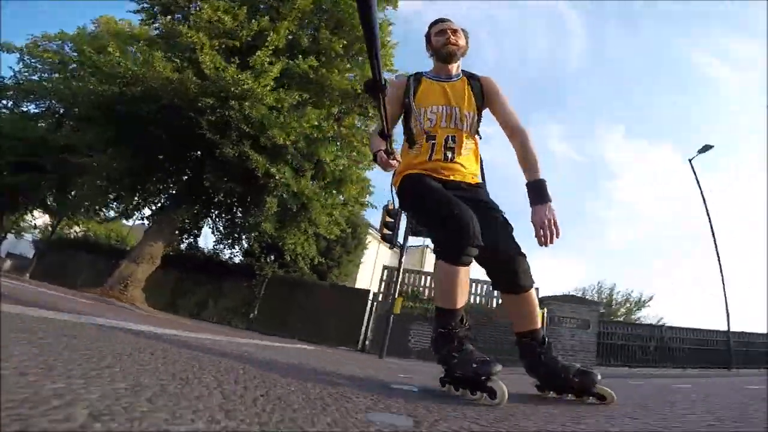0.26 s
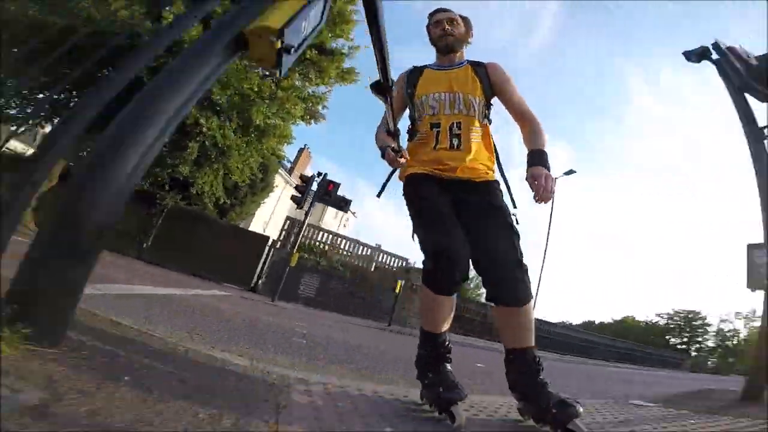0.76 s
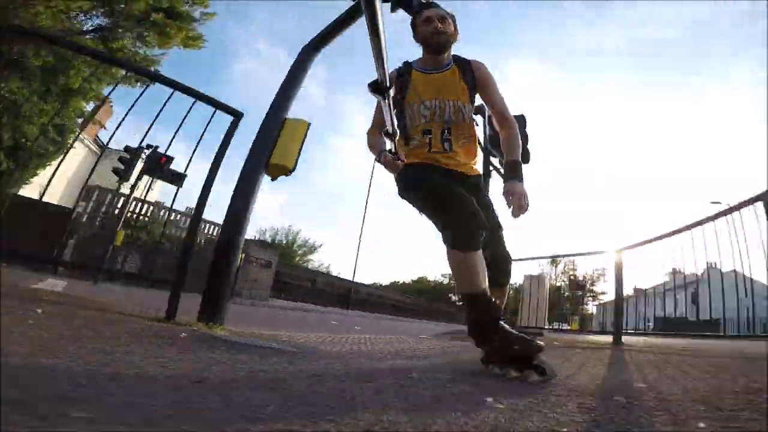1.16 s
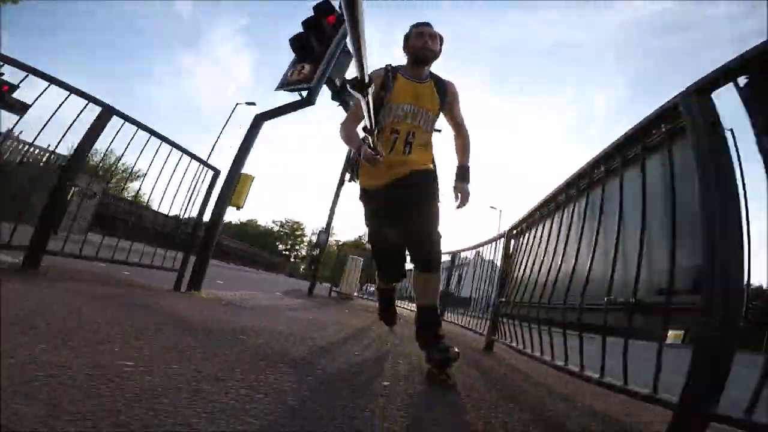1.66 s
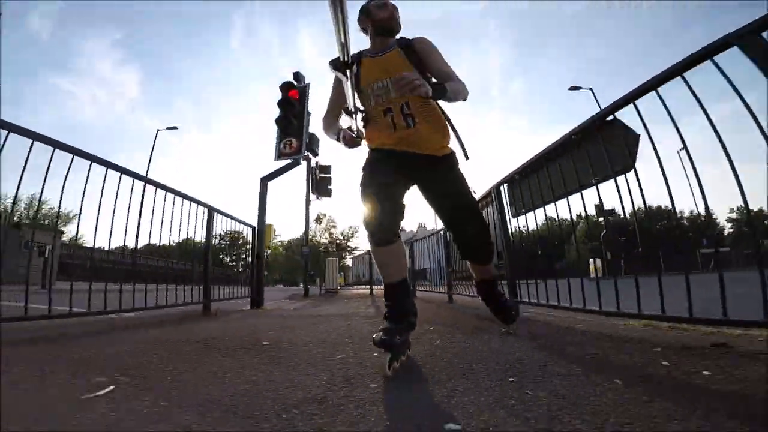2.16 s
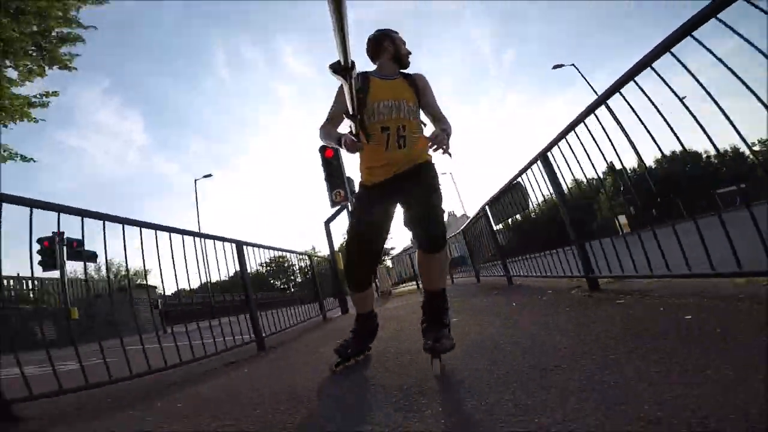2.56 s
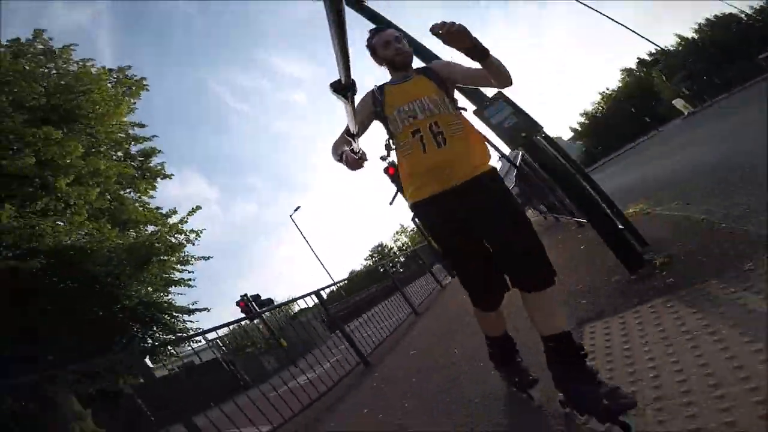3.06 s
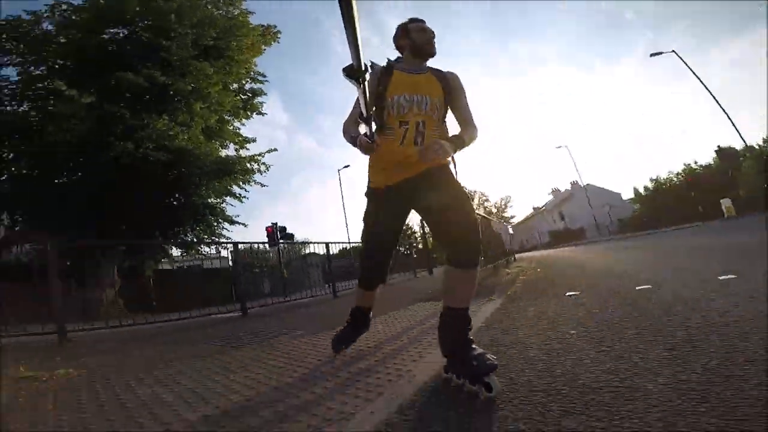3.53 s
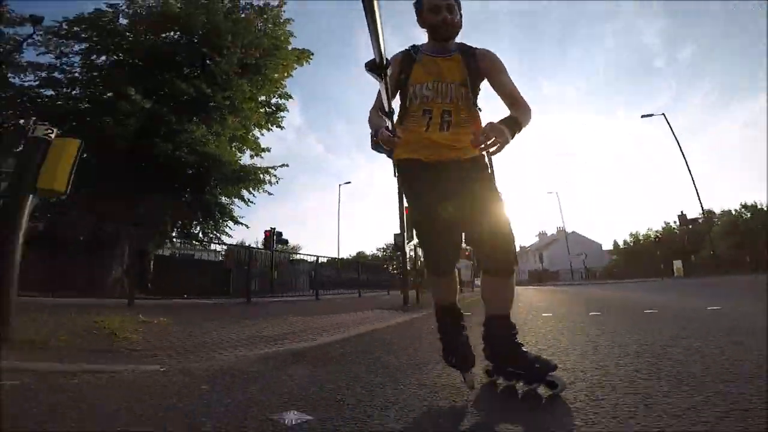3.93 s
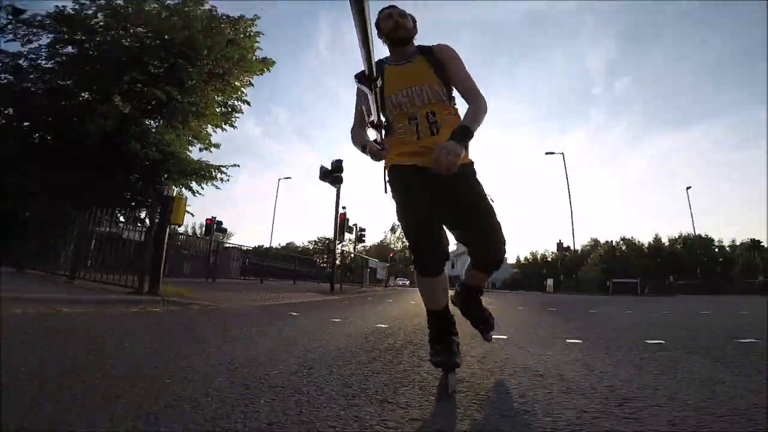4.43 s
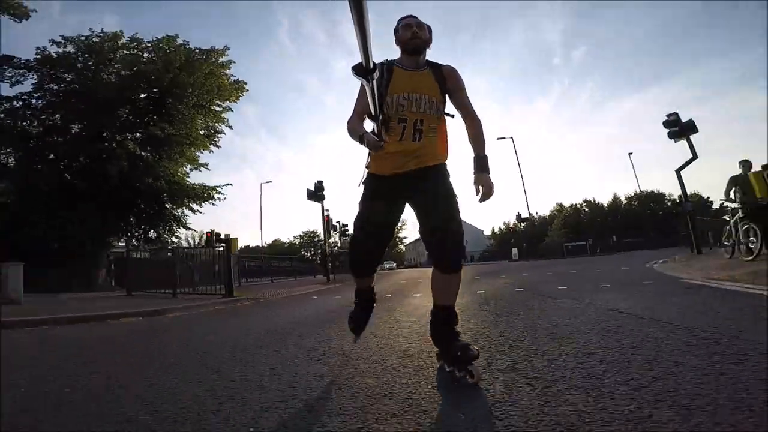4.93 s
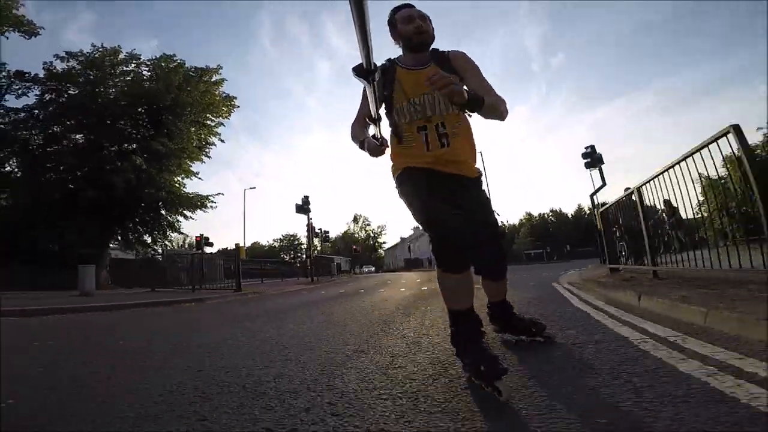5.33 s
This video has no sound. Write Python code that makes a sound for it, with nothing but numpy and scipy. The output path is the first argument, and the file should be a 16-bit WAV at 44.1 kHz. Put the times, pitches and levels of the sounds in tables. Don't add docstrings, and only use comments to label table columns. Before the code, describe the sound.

Close, dry, mono outdoor sound from a microphone held low on a pole near inline skates. Deep, uneven wind rumble runs throughout and is much louder than the thin, gritty wheel noise. From 0 to 1.4 s hard wheels roll on rough ground, with clusters of sharp ticks and rattles at joints, faint bearing singing and a low boot thud near 0.95 s. Wind swells and flaps from about 1.2 s. A hard landing snaps and thuds at 1.6 s; rolling is quieter afterwards, with a short rattling scrape and thud around 2.0-2.1 s and a strong gust. Sparse stone ticks follow at 2.7-3.0 s. Studded paving clatters at 3.15-3.5 s, with several soft thuds and a tiny high squeak at 3.55 s. Then smoother rolling swells and fades, with short mid-pitched jolts at 4.2-4.8 s, a loud hollow mount knock at 4.84 s and wind buffets to 5.6 s.

```python
import sys
import numpy as np
from scipy import signal
from scipy.fft import rfft, irfft, next_fast_len
from scipy.io import wavfile
from scipy.ndimage import uniform_filter1d, minimum_filter1d

SR = 44100
rng = np.random.default_rng(int(sys.argv[2]) if len(sys.argv) > 2 else 0)


def output_pcm(signal):
    pcm = np.clip(np.atleast_2d(signal).T, -1, 1) * 32767
    wavfile.write(sys.argv[1], SR, np.round(pcm).astype(np.int16))


def field_ratio(decibels):
    return 10 ** (np.asarray(decibels, dtype=float) / 20)


N = 246519


def evened(x):
    return x / np.sqrt(np.mean(x ** 2) + 1e-20)


def columns(rows, t):
    s, *values = np.transpose(rows)
    return np.array([np.interp(t, s, v) for v in values])


def add(mix, s, sound):
    part = mix[max(round(s * SR), 0):][:len(sound)]
    part += sound[:len(part)]


def ring(x, modes):
    hz = abs(np.fft.fftfreq(next_fast_len(len(x)), 1 / SR))
    power = sum(field_ratio(2 * db) / (1 + (1.19 * (hz - f) / w) ** 2) ** 2 for f, w, db in modes)
    log_gain = 0.5 * np.log(power / np.mean(power))
    body = np.exp(np.conj(signal.hilbert(log_gain)))[:len(hz) // 2 + 1]
    return irfft(rfft(x, len(hz)) * body, len(hz))[:len(x)]


def lumps(seconds):
    size = max(int(seconds * SR), 2)
    smooth = uniform_filter1d(rng.standard_normal(N), size)
    return evened(uniform_filter1d(smooth, size))


def patchy(x, patchy_db):
    z = signal.stft(x, nperseg=256)[2]
    patches = uniform_filter1d(rng.standard_normal(z.shape), 4, 0)
    patches = evened(uniform_filter1d(patches, 7, 1))
    gain = field_ratio(patchy_db * patches - patchy_db ** 2 / 8.4)
    return signal.istft(z * gain, nperseg=256)[1][:N]


def asphalt(per_s, spread_db, lumpy_db):
    size_db = spread_db * np.minimum(rng.exponential(1, N), 4)
    grains = rng.standard_normal(N) * (rng.random(N) < per_s / SR) * field_ratio(size_db)
    force = evened(grains) + 1.97 * rng.standard_normal(N)
    return evened(force * field_ratio(lumpy_db * lumps(0.026)))


# start_s, roughness_db, heel_load_db
ROAD = [(0.0, -61, -4.5), (0.42, -62.5, -7), (0.92, -65.5, -2.5), (1.1, -66.5, -4.5), (1.38, -72, -0.5),
        (2.12, -70.5, 2), (2.46, -72, 4), (2.69, -68, 2.5), (2.86, -70.5, -0.5), (3.11, -65.5, -4),
        (3.38, -63.5, -4), (3.63, -71.5, -2.5), (4.12, -68.5, -2.5), (4.3, -64.5, -3.5), (4.69, -66.5, 1),
        (5.12, -70.5, -1), (5.36, -67, 1), (5.59, -62.5, 7)]
# hz, width_hz, level_db
BOOT_MODES = [(926, 230, -4), (1060, 28, -2)]
# hz, width_hz, level_db
FRAME_MODES = [(1417, 100, 4.5), (1653, 110, 2), (1863, 130, 3), (2030, 134, -1.5), (2274, 490, -4.5),
               (2578, 154, -1.5), (2790, 68, -5)]
# hz, width_hz, level_db
TREAD_MODES = [(3650, 710, 1), (3970, 170, -1), (4530, 470, 2), (5210, 480, -2), (6530, 2000, -3),
               (7350, 240, -0.5), (8710, 1340, 1), (9740, 1000, -1.5), (10250, 810, -6)]
# hz, width_hz, level_db
GRIT_BANDS = [(11400, 900, 0), (12400, 1000, 0), (13400, 1000, -2), (14400, 1000, -4)]


def rolling():
    rough_db, heel_db = columns(ROAD, np.arange(N) / SR)
    over_db = rough_db + 66
    road = asphalt(per_s=900, spread_db=2.0, lumpy_db=0.78)
    frame = road * field_ratio(rough_db)
    tread = road * field_ratio(-73 + 0.31 * over_db)
    grit = road * field_ratio(-82.5 + 0.083 * over_db)
    boot = ring(road * field_ratio(rough_db + heel_db), BOOT_MODES)
    pebbles_per_s, pebble_db, spread_db = 41, -89, 3.5
    pebble_db = pebble_db + over_db + spread_db * np.minimum(rng.exponential(1, N), 3)
    flicks = (rng.random(N) < pebbles_per_s / SR) * field_ratio(pebble_db)
    grit = grit + signal.oaconvolve(flicks, np.hanning(220), "same") * rng.standard_normal(N)
    low = boot + patchy(ring(frame, FRAME_MODES), patchy_db=1.5)
    return low, ring(tread, TREAD_MODES) + ring(grit, GRIT_BANDS)


# start_s, length_s, lift_db
GLIDE_LOADS = [
    (-.2, 0.73, 8.5),
    (0.599, .42, 9),
    (3.116, 0.54, 8),
    (3.84, .1, 7),
    (4.097, .56, 8.5),
    (5.197, .6, 5),
]
# hz, width_hz, level_db
AXLE_MODES = [(6050, 340, 16), (6630, 240, 17)]


def axles():
    t = np.arange(N) / SR
    level_db, ease_s = -86, 0.14
    for s, length, lift_db in GLIDE_LOADS:
        inside_s = np.minimum(t - s, s + length - t)
        level_db = level_db + lift_db * np.clip(inside_s / ease_s + 0.5, 0, 1)
    return ring(asphalt(per_s=1100, spread_db=2, lumpy_db=2.5) * field_ratio(level_db), AXLE_MODES)


def strike(length_s, chance):
    t = np.arange(chance.shape[1]) / SR
    swell = 1 - np.exp(-(t / (0.5 * length_s)) ** 2)
    fade = np.exp(-t / (0.22 * length_s)) + 0.33 * np.exp(-t / (1.62 * length_s))
    tick = 0.3 * np.exp(-((t - 0.4 * length_s - 0.001) / 0.0016) ** 2)
    bumps = evened(uniform_filter1d(chance[0], 60))
    rattle = field_ratio(2.9 * np.clip(bumps, -2, 1.5))
    return (swell * fade * rattle + tick) * evened(0.15 * chance[1] + chance[2:])


# start_s, level_db, dullness_db, length_ms
SLAB_HITS = [(.0124, -44.5, -6, 7), (.0425, -50, 1, 11), (.066, -53, -8, 7), (.086, -47.5, -5, 6),
             (.121, -53, -3, 8), (.25, -54, -12, 10), (.293, -51, -2, 8), (.311, -51.5, 2, 25),
             (.451, -60, 5, 8), (.54, -53, -10, 10), (.587, -50, -3, 9), (.6065, -47, -10, 21),
             (.632, -44, -10, 10), (.658, -47, -6, 14), (.7057, -42, -11, 13), (.716, -42.5, -21, 7),
             (.826, -55, -2, 8), (.866, -46, -5, 8), (.884, -47, -8, 9), (.894, -44, -3, 17),
             (.9476, -44.5, -12, 8), (.951, -56.5, 13, 9), (1.002, -47, -9, 8), (1.0157, -46, -5, 10),
             (1.025, -48, 0, 7), (1.0715, -45.5, -44, 5), (1.172, -56, -1, 10), (1.2175, -51.5, -22, 10),
             (1.2655, -57.5, 2, 13), (1.344, -56.5, 2, 12)]
# start_s, level_db, dullness_db, length_ms, upper_frame_lean_db
STUD_HITS = [(1.5943, -48, -1, 7, 2), (1.6, -37, -20, 7, 1), (1.958, -72, 12, 9.2, -3),
             (1.9906, -54, 1, 6, -1), (2.016, -52, 3, 19, 0), (2.028, -53, -4, 7.7, 3),
             (2.05, -45, -3, 10, 3), (2.0704, -49, -10, 17, 7), (2.079, -46, -3, 9.2, 2),
             (2.117, -48, -14, 12.5, -8), (3.152, -36.5, -13.5, 15, -4), (3.161, -48, -24, 7, 0),
             (3.1737, -52, -3, 9.2, -1), (3.182, -44, -15, 9, 3), (3.19, -56, -1, 9.2, 2),
             (3.215, -43, -18, 4.6, 5), (3.218, -37, -14.5, 11, -6.5), (3.2524, -45.5, -9, 22, -1),
             (3.266, -54, -11, 8, -7), (3.363, -48.5, -6, 7, 0), (3.417, -52, -1, 13, -6.5),
             (3.434, -52, -7, 8, 0), (3.503, -48.5, -1.5, 8, 1), (3.508, -45, -11, 6.3, 9)]
# start_s, level_db, dullness_db, length_ms
STONE_HITS = [(2.7, -49, -9, 13.6), (2.749, -54, -2.5, 8), (2.903, -51.5, -9, 17), (2.9133, -53.5, -7, 7.5),
              (2.985, -53, -8, 8.2), (3.568, -59, -3, 9), (3.876, -53.5, -6, 10.6), (3.893, -53.5, -4, 17),
              (4.022, -51, -5, 8.9), (4.072, -51, -8, 8.9), (4.2521, -52.5, -2, 30), (4.347, -62, -10, 7),
              (4.6009, -55, -10, 11), (4.623, -50, -10, 9.3), (4.735, -53, -17, 9.9), (4.8336, -60, 5, 6),
              (5.188, -58, -4, 15), (5.371, -57.5, 2, 10.4), (5.43, -68, -11, 5), (5.543, -66, 11, 11)]
# hz, width_hz, level_db
STRUCK_TREAD_MODES = [(3550, 1400, -2), (4490, 730, 2.5), (5500, 440, 0.5), (6420, 350, 7.5),
                      (7100, 430, 3), (8440, 1300, 1.5), (10150, 710, 3)]
# hz, width_hz, level_db
STRUCK_GRIT_BANDS = [(11800, 700, -8), (12400, 900, 20.5), (14600, 1100, 19), (15500, 550, 13)]


def blows():
    struck = np.zeros((4, N))
    blow_db, dull_share = np.array([-8, -2.5, -3, -20.5]), np.array([0.038, 1, 0.8, -0.37])
    hits = SLAB_HITS + STUD_HITS + STONE_HITS
    smooth_from_s = STONE_HITS[5][0]
    chances = rng.standard_normal((len(hits), 6, 2500))
    for (s, db, dull_db, ms, *given_lean), chance in zip(hits, chances):
        lean_db = given_lean[0] if given_lean else 2 * chance[0, 0]
        parts_db = db + blow_db + dull_db * dull_share + lean_db * np.array([0, -1, 1, 0])
        if s >= smooth_from_s:
            parts_db[3] -= 7
        for part, level, burst in zip(struck, field_ratio(parts_db), strike(ms / 1000, chance)):
            add(part, s - 0.3 * ms / 1000, level * burst)
    bodies = STRUCK_TREAD_MODES, FRAME_MODES[:4], FRAME_MODES[4:], STRUCK_GRIT_BANDS
    return sum(ring(part, modes) for part, modes in zip(struck, bodies))


def wheels():
    low, bright = rolling()
    return low + patchy(bright + axles() + blows(), patchy_db=1.0)


# start_s, level_db, pitch_hz, length_ms
SKATE_JOLTS = [(.046, -59, 2000, 10), (.126, -57, 1850, 10.6), (.403, -70, 1400, 9.6),
               (.543, -59, 1910, 9.2), (.632, -61, 1930, 10), (.66, -56, 2070, 9), (.705, -55, 1980, 9.8),
               (.707, -55, 2590, 10), (.735, -59, 1635, 30), (.828, -58, 1960, 16), (.865, -60, 2700, 10),
               (.893, -61, 2650, 26), (.9, -61, 1390, 16), (.952, -50, 1890, 9), (.954, -54.5, 1450, 12.5),
               (1.003, -60, 1990, 10), (1.027, -57, 1770, 9), (1.027, -58, 2690, 12),
               (1.594, -59, 2020, 7), (1.6, -44.5, 6550, 4), (1.599, -51, 2210, 5), (1.603, -57, 5500, 5),
               (1.602, -55, 7440, 6), (1.605, -51, 2330, 5.2), (1.607, -61, 4260, 9.9),
               (1.6, -56, 4530, 6), (1.96, -55, 1900, 6), (1.993, -57, 2100, 5), (2.014, -58, 2300, 5),
               (2.024, -57, 2500, 9), (2.071, -55, 2190, 6), (2.036, -55, 2180, 5), (2.053, -54, 2400, 5),
               (2.081, -51.5, 2345, 9), (3.155, -54, 1480, 8.6), (3.168, -57, 2660, 6),
               (3.184, -59, 4070, 6), (3.183, -55, 2650, 5), (3.187, -55, 1483, 19), (3.222, -48, 1430, 8),
               (3.227, -56, 2320, 6.1), (3.228, -65, 4200, 5.9), (3.164, -57, 1900, 7),
               (3.194, -57, 2200, 7.9), (3.238, -59, 1600, 9), (3.254, -57, 1700, 10.5),
               (3.297, -57, 1450, 7.7), (3.302, -65, 2700, 8), (3.42, -58, 1750, 9.8),
               (4.234, -62, 1060, 25), (4.255, -65, 1350, 14), (4.27, -58, 1010, 14),
                (4.285, -59, 1910, 20), (4.324, -58, 2600, 8), (4.336, -57, 1060, 18),
                (4.365, -61, 1060, 18), (4.389, -63, 1060, 16), (4.449, -59, 1060, 22),
                (4.45, -62, 2590, 14), (4.476, -63, 1060, 18), (4.539, -61.5, 2600, 25),
                (4.57, -59, 1060, 28), (4.608, -60, 1600, 26), (4.645, -59, 1080, 14),
                (4.645, -60, 2620, 7), (4.701, -58, 1060, 25), (4.76, -60, 1870, 12),
                (5.189, -61, 1910, 14)]


def jolts():
    out, rows, t = np.zeros(N), SKATE_JOLTS, np.arange(3000) / SR
    for (s, db, hz, ms), chance in zip(rows, rng.standard_normal((len(rows), 3, 3000))):
        u = t / (0.3 * ms / 1000)
        apart_hz = np.array([[-1], [0], [1.2]]) * 1400 / ms
        waver = 1 + 0.035 * evened(uniform_filter1d(chance, size=60))
        turns = np.cumsum((hz + apart_hz) * waver, axis=1) / SR
        modes = np.array([0.45, 1, 0.45]) @ np.sin(2 * np.pi * turns)
        add(out, s - 0.3 * ms / 1000, field_ratio(db - 1) * u * np.exp(1 - u) * modes)
    return out


# start_s, level_db, upper_modes_db
MOUNT_KNOCKS = [(1.257, -52, -16), (1.42, -41.5, -17), (1.479, -70, -4), (1.505, -42, -28),
                (1.592, -54, -13), (2.012, -50, -5), (2.05, -47, -19), (2.278, -43.5, -36),
                (3.153, -42, -18), (3.364, -65, -4), (3.63, -39, -17.5), (4.33, -63, -17),
                (4.836, -29.5, -11)]
# hz, level_db, t60_s
MOUNT_MODES = [(906, -8, 0.03), (944, -4.5, 0.07), (1072, -1, 0.11), (1610, 3.5, .11), (1910, 6.5, 0.085),
               (2110, 2, .025), (2550, -1, 0.016), (3600, -13, .012), (4500, -14, .012)]


def knocks():
    out, t = np.zeros(N), np.arange(4000) / SR
    touch = np.exp(-(t / 0.0038) ** 6)
    push = (1 - np.exp(-t / 0.0003)) * (1 + touch * (0.7 + t / 0.004))
    grip = 1 / (1 + (t / 0.027) ** 6)
    for s, db, upper_db in MOUNT_KNOCKS:
        modes = 0
        for hz, mode_db, t60 in MOUNT_MODES:
            decay_db = mode_db + upper_db * (hz > 1300) - 60 * t / t60
            modes = modes + field_ratio(decay_db) * np.sin(2 * np.pi * hz * t)
        add(out, s - 0.0016, field_ratio(db - 14) * push * modes * grip)
    return out


# start_s, level_db, pitch_hz
BOOT_THUDS = [(0.947, -15, 171), (1.595, -14.5, 220), (2.013, -16.5, 197), (1.691, -28, 151),
              (3.146, -24.5, 201), (3.209, -26.5, 191), (3.25, -22, 194), (3.287, -23, 186),
              (3.365, -15, 158), (3.431, -13.5, 195), (4.299, -22.5, 154)]


def thuds():
    out, t = np.zeros(N), np.arange(round(0.016 * SR)) / SR
    for s, db, hz in BOOT_THUDS:
        shell = np.sin(2 * np.pi * hz * t) + 0.19 * np.cos(2 * np.pi * 2 * hz * t)
        add(out, s - 0.004, field_ratio(db - 9.5) * signal.windows.tukey(len(t), 0.7) * shell)
    return out


def squeak():
    start_s, length_s, pitch_hz, level_db = 3.552, 0.03, 12650, -64
    out, t = np.zeros(N), np.arange(round(length_s * SR)) / SR
    add(out, start_s, field_ratio(level_db) * np.hanning(len(t)) * np.sin(2 * np.pi * pitch_hz * t))
    return out


# start_s,
# level_db, pitch_hz
AIR_FLAPS = [(.628, -45, 355), (.658, -52, 390), (.705, -42, 450), (.775, -51, 315), (.859, -41, 560),
             (.914, -45, 339), (1.011, -40, 322), (1.09, -43, 560), (1.139, -46, 560), (1.182, -40, 305),
             (1.194, -41, 650), (1.21, -31, 324), (1.232, -35, 491), (1.25, -38, 443), (1.27, -51, 640),
             (1.302, -39.5, 600), (1.328, -35.5, 397), (1.355, -37.5, 470), (1.449, -41, 600),
             (1.474, -49, 600), (1.488, -47, 720), (1.432, -56, 1000), (1.501, -35, 347), (1.592, -38, 380),
             (1.598, -31, 420), (1.604, -36, 350), (1.8, -52, 370), (1.897, -51, 453), (1.954, -51, 361),
             (1.989, -46, 345), (2.018, -42, 310), (2.119, -44, 401), (2.281, -42, 390), (2.03, -33, 273),
             (2.09, -39, 282), (2.14, -26, 270), (2.415, -45, 400), (2.512, -38, 570), (2.56, -44, 520),
             (2.61, -43, 600), (2.7, -41, 500), (2.75, -44, 560), (2.824, -32, 361), (2.859, -38, 523),
             (2.944, -51, 369), (3.16, -33, 280), (3.256, -41, 300), (3.398, -37, 266)]


def flaps():
    out, cycles = np.zeros(N), 4.5
    for s, db, hz in AIR_FLAPS:
        u = np.arange(0, cycles, hz / SR) / cycles
        turns = cycles * (1.125 * u - 0.2 * u ** 2)
        tone = np.sin(2 * np.pi * turns) + 0.21 * np.sin(3.3 * np.pi * turns)
        add(out, s - 0.001, field_ratio(db - 5) * np.sin(np.pi * u ** 0.42) ** 2 * tone)
    return out


GUST_CENTRES = [
    50,
    150,
    300,
    620,
]
# hz, density_db
WIND_SPECTRUM = [(8.8, 4.5), (15, 0), (27, 7.5), (60, -5), (152, -2.5), (245, -12), (333, -18), (494, -27),
                 (771, -39), (900, -51.5), (1170, -91), (1980, -120)]
# start_s, level_db
AIR_SPEED = [(0, -55), (.6, -54.5), (.95, -50), (1.27, -42.5), (1.39, -49.5), (1.62, -55), (1.76, -51.5),
             (2.15, -45.5), (2.33, -54.5), (2.5, -46.5), (2.86, -46.5), (3.06, -58), (3.2, -49.5),
             (3.95, -61), (4.2, -55), (4.6, -53), (5.1, -58), (5.59, -51.5)]
# start_s, level_db
WHEEL_WEIGHT = [(0.0, -32.5), (0.33, -35.5), (0.73, -31), (0.78, -38.5), (0.96, -30.5), (1.25, -46),
                (2.02, -34), (2.3, -47.5), (2.48, -34), (3.08, -42.5), (3.22, -40.5), (3.27, -43),
                (3.44, -31), (3.49, -36.5), (4.06, -45), (4.28, -33), (4.56, -41.5), (5.59, -35.5)]
# centre_s, lift_db, half_length_s, share_reaching_edge
AIR_SLAPS = [(0.143, -4.5, 0.2, -1), (0.623, 6.5, 0.076, 0.4), (0.913, 3, 0.05, 0.85),
             (1.074, 3.5, 0.085, 0.05), (1.507, 12, 0.046, 1.1), (1.567, -1.5, 0.01, 3),
             (1.97, -0.5, 0.054, -1), (5.386, 1, 0.031, 0), (1.717, 15, 0.019, 0.3),
             (2.11, 5.5, 0.049, 0.6), (2.344, 4, 0.041, 0), (2.547, 3.5, 0.074, 0),
             (2.784, 3.5, 0.27, 0.63), (2.985, -6, 0.075, 0.2), (3.315, -5, 0.11, 1.5),
             (3.427, -6.5, 0.069, -.8), (3.746, -4.5, 0.1, 0.3), (3.998, -2, 0.089, 0),
             (4.327, 9, 0.25, 0.35), (4.609, 6.5, 0.018, 0), (4.731, 12.5, 0.01, 0), (4.88, 6, 0.14, 0.27),
             (1.43, -3, .015, 2), (1.94, -2.5, .03, 2.5), (2.34, -2, 0.045, 2.5), (4.207, -1, 0.013, 3),
             (4.64, -2, .012, 3), (4.95, -4, 0.055, 0), (5.4, 4.5, 0.054, 0.1), (5.122, -6.5, 0.054, 1),
             (5.262, 4.5, 0.05, 0), (5.557, 11.5, 0.059, 0.5)]


def wind():
    frames, hz = N // 256 + 5, np.fft.rfftfreq(1024, 1 / SR)
    real, imag, patches = rng.standard_normal((frames, 513, 3)).T
    patches = evened(uniform_filter1d(uniform_filter1d(patches, 6, 0), 8, 1))
    t = np.arange(frames) * 256 / SR
    air_db, weight_db = columns(AIR_SPEED, t)[0], columns(WHEEL_WEIGHT, t)[0]
    s, lift_db, half, reach = np.transpose(AIR_SLAPS)[:, :, None]
    slaps_db = lift_db * np.exp(-((t - s) / half) ** 2)
    roar_db = air_db + 0.067 * weight_db
    edge_db = air_db + (reach * slaps_db).sum(0)
    eddies = uniform_filter1d(rng.standard_normal((4, frames)), size=7)
    eddies = evened(uniform_filter1d(eddies, size=7))
    parts_db = np.array([slaps_db.sum(0), weight_db, roar_db, edge_db]) + 0.11 * eddies
    parts_db = parts_db - 10 * np.log10(np.mean(field_ratio(parts_db) ** 2, axis=1, keepdims=True))
    log_hz = np.log(hz + 1)
    shares = np.array([np.interp(log_hz, np.log(GUST_CENTRES), row) for row in np.eye(4)])
    f, density_db = np.transpose(WIND_SPECTRUM)
    shape_db = np.interp(log_hz, np.log(f), density_db) - 30 * np.log2(np.maximum(hz / 950, 1))
    flicker = evened(uniform_filter1d(rng.standard_normal(frames), 3))
    upper = shares[3] + 0.5 * shares[2]
    level_db = shape_db[:, None] + shares.T @ parts_db + 1.1 * patches + 2.15 * np.outer(upper, flicker)
    z = (real + 1j * imag) * field_ratio(level_db)
    return field_ratio(-32) * evened(signal.istft(z, nperseg=1024, noverlap=768)[1][:N])


def scene():
    return (wheels() + jolts() + knocks() + thuds() + squeak() + flaps() + wind())[None]


def thinned(x, from_hz, under_db):
    hz, _, z = signal.stft(x, SR, nperseg=1024)
    power = uniform_filter1d(abs(z) ** 2, size=5, axis=1)
    level_db = 10 * np.log10(abs(power) + 1e-20)
    bar_db = under_db + 4.0 * (hz[:, None] - from_hz) / 1000
    gain = np.clip((level_db - bar_db) / 5, 0.1, 1)
    return signal.istft(z * gain, SR, nperseg=1024)[1][:, :N]


def band_limit(x):
    return signal.sosfilt(signal.butter(12, 15670, fs=SR, output="sos"), x)


def record(dry):
    room = minimum_filter1d(np.minimum(field_ratio(-21) / (abs(dry) + 1e-9), 1), size=441)
    held = dry * uniform_filter1d(room, size=441) ** 0.44
    low_pass = signal.firwin(151, 15300, window=("kaiser", 3.5), fs=SR)
    cut = signal.oaconvolve(held, low_pass[None], "same")
    mix = thinned(cut, from_hz=14000, under_db=-110.5)
    return band_limit(mix)


dry = scene()
out = record(dry)
output_pcm(out)
```